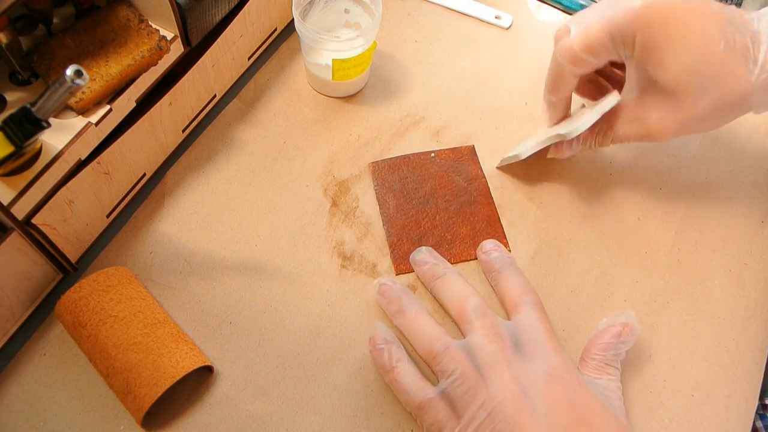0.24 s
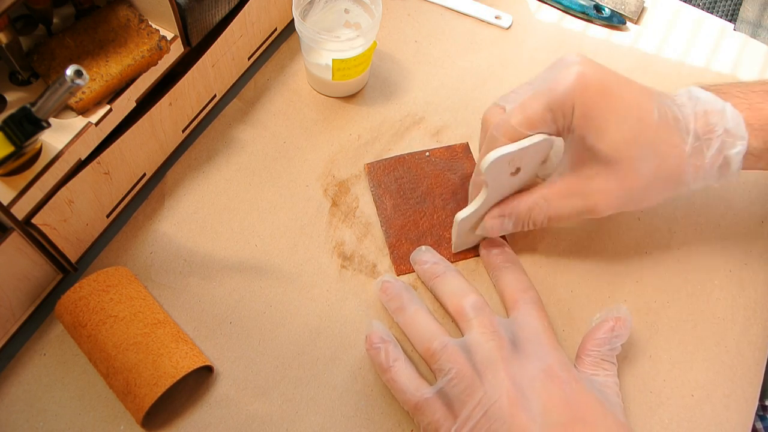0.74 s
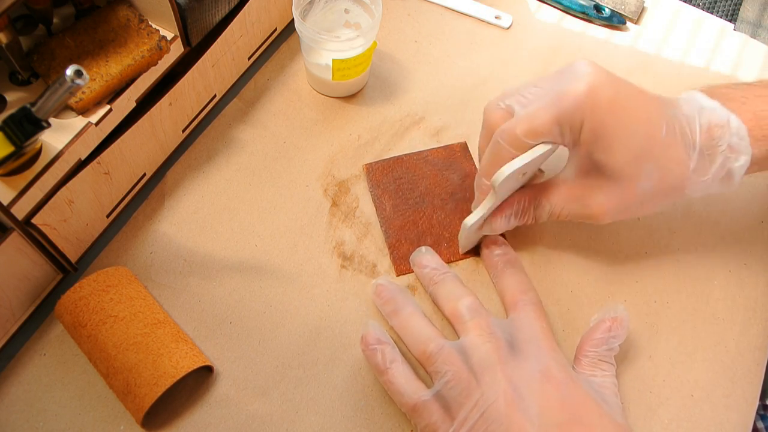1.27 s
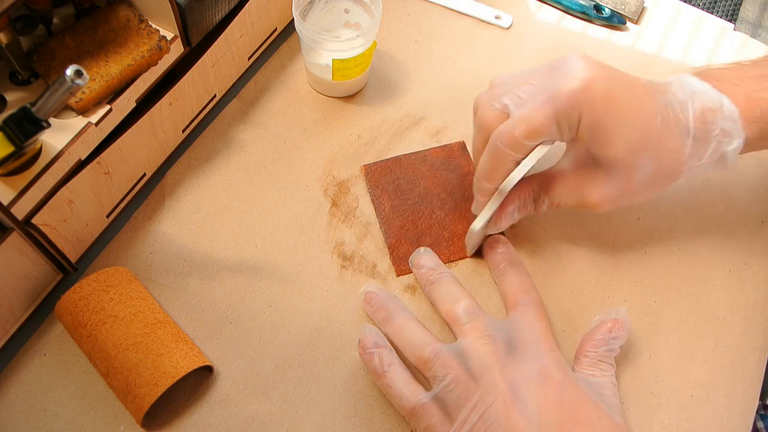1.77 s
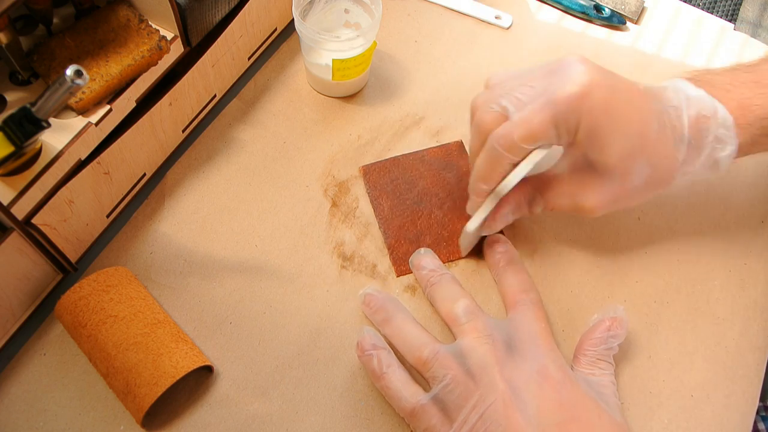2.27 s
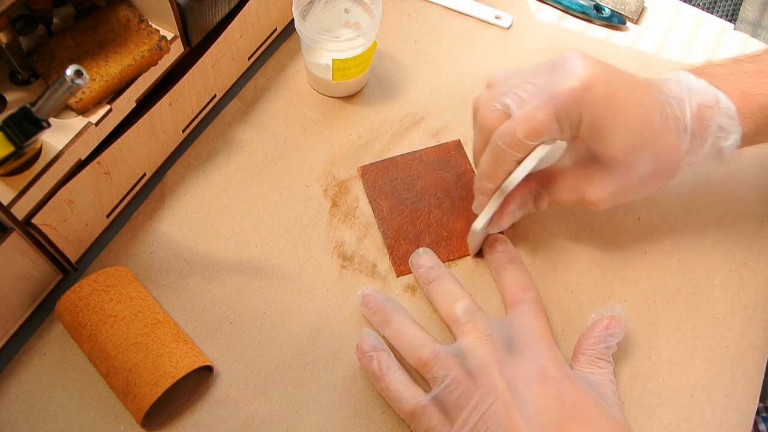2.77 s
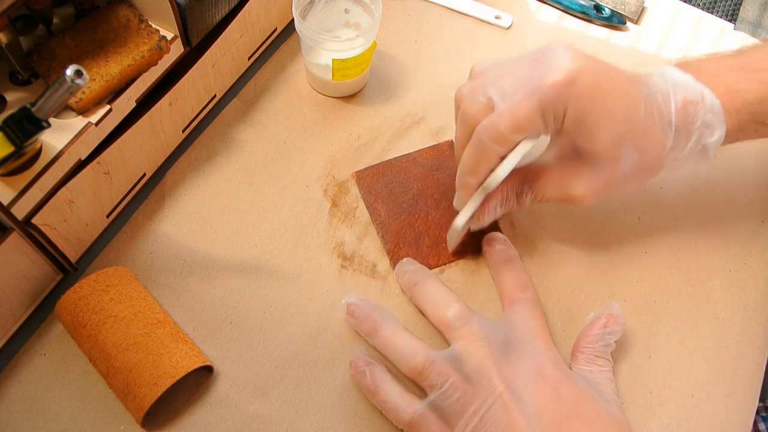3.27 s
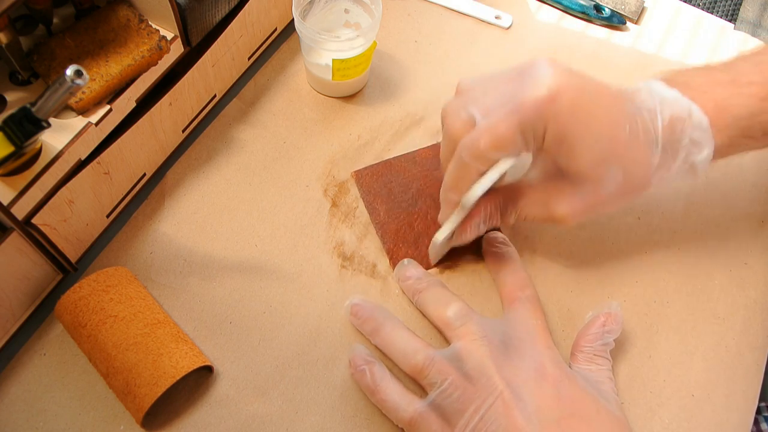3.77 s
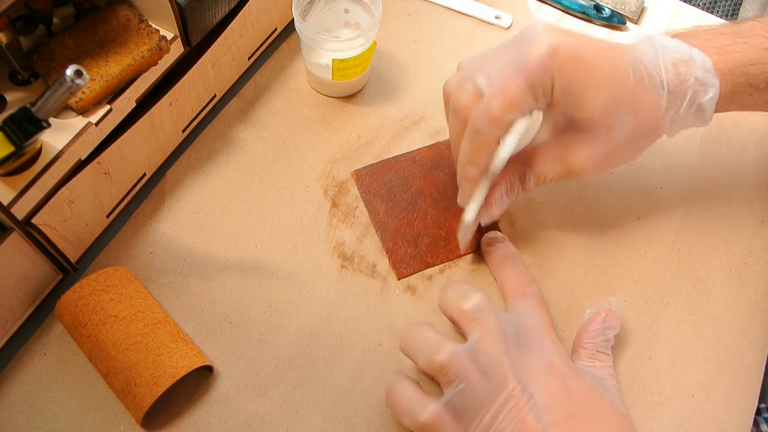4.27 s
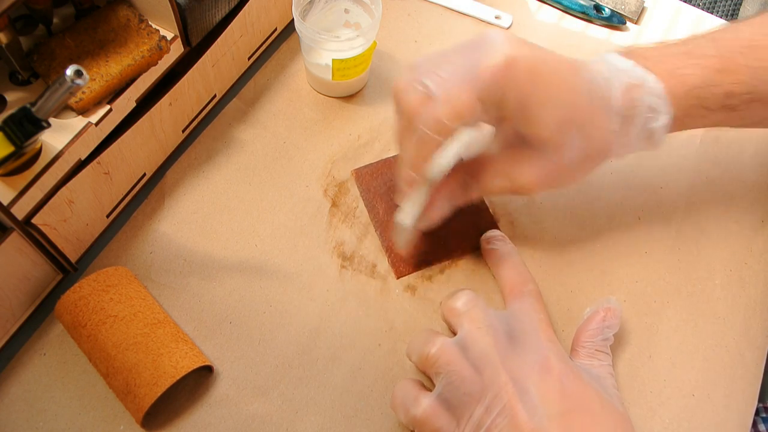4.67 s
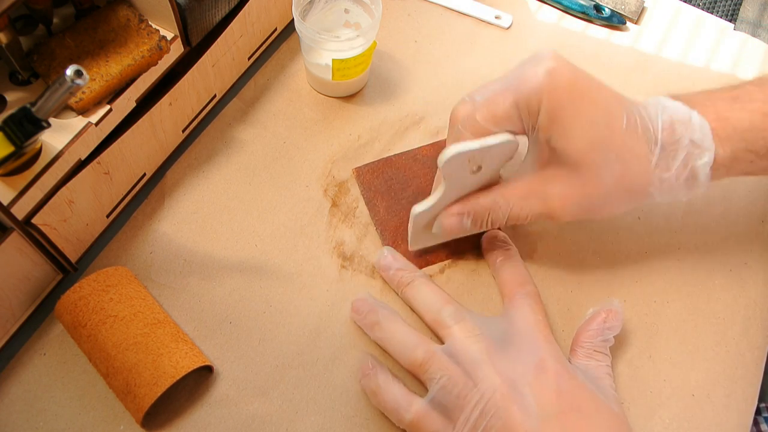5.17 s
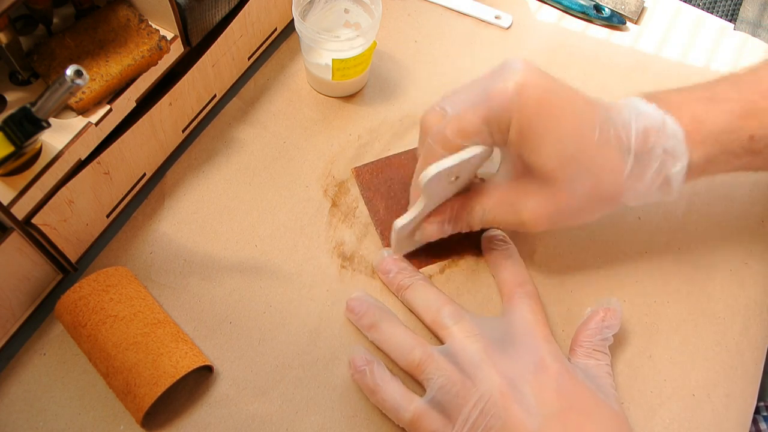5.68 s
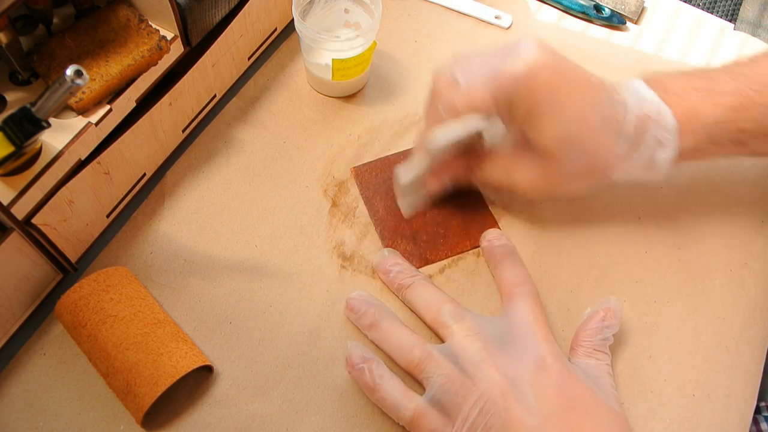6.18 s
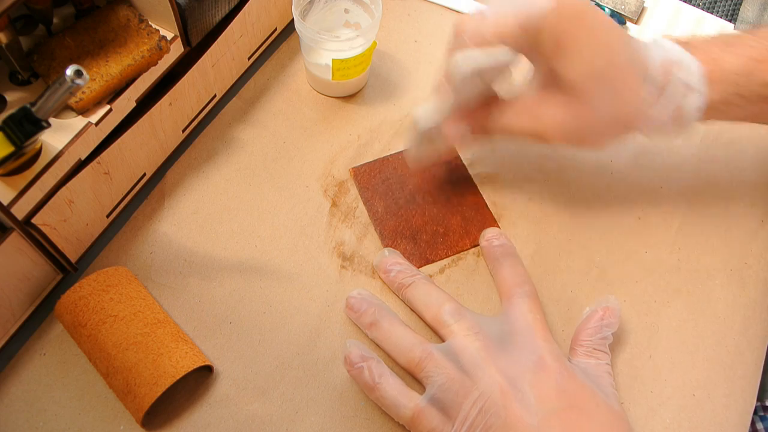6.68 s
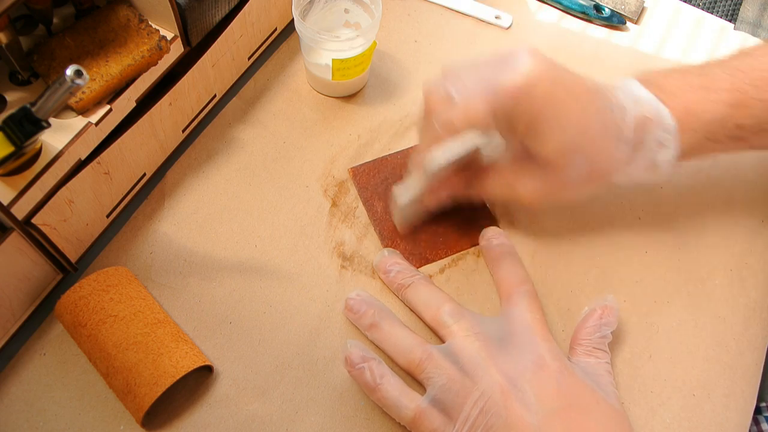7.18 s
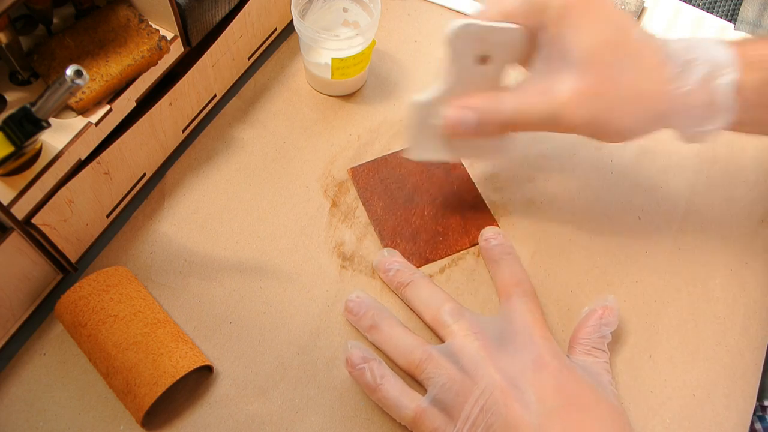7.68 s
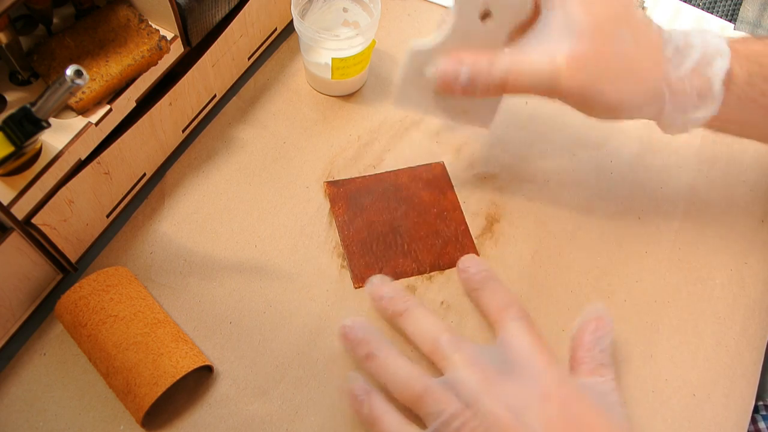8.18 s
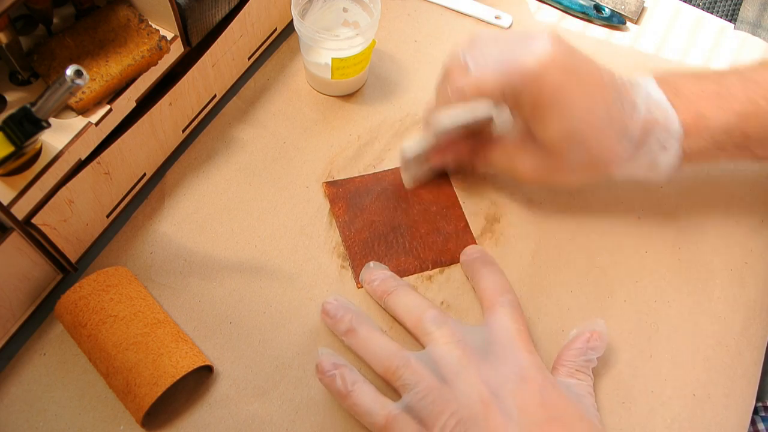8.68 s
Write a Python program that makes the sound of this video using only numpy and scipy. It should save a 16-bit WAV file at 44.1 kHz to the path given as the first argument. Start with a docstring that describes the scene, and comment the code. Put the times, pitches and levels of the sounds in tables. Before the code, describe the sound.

Gloved hands shuffle leather on a bench, then a small blade pats down, rasps across it and repeatedly cracks off the edge.

```python
"""Gloves and leather slide and scuff first, over faint room air and a low hum that wavers to the end.
From about one second a plastic spatula is drawn in quick strokes over leather on a workbench:
it lands with a pat and a soft thump, hisses over the grain and often snaps off onto the bench.
Ticks, knocks, rubs and slides fall in between; late on, one stroke drags the leather along the bench.
Friction is filtered noise, contacts are noise bursts, blade and bench ring as decaying modes."""
import sys
import numpy as np
from scipy import signal
from scipy.fft import rfft, irfft, next_fast_len
from scipy.io import wavfile
from scipy.ndimage import uniform_filter1d

SR = 44100
rng = np.random.default_rng(int(sys.argv[2]) if len(sys.argv) > 2 else 0)


def bounce(signal):
    """Save signal as a 16-bit WAV file at the path given by the first command-line argument."""
    frames = np.transpose(np.atleast_2d(signal))
    limited = np.clip(frames, -1, 1)
    pcm = np.round(limited * 32767).astype(np.int16)
    wavfile.write(sys.argv[1], SR, pcm)


N = 394254
TIME = np.arange(N) / SR


def amp(db):
    """Decibels to gain."""
    return 10 ** (np.asarray(db) / 20)


def unit(x):
    """Scales to an rms of one."""
    return x / np.sqrt(np.mean(x ** 2) + 1e-20)


def read(points, hz):
    """Reads a table of (f/Hz, value) on a log-frequency axis."""
    f, value = np.transpose(points)
    return np.interp(np.log(hz + 1), np.log(f + 1), value)


def add(mix, s, sound):
    """Mixes a sound in at time s."""
    start = max(round(s * SR), 0)
    part = mix[..., start:][..., :sound.shape[-1]]
    part += sound[..., :part.shape[-1]]


def shaped(x, gain):
    """Filters x by a gain given as a function of frequency."""
    size = next_fast_len(x.shape[-1])
    spectrum = rfft(x, size) * gain(np.fft.rfftfreq(size, 1 / SR))
    return irfft(spectrum, size)[..., :x.shape[-1]]


def coloured(x, points, size=2048):
    """Causal filter of unit energy with the spectrum of a table, so that attacks stay sharp."""
    hz = abs(np.fft.fftfreq(size, 1 / SR))
    log_gain = np.log(amp(read(points, hz)))
    minimum_phase = np.exp(np.conj(signal.hilbert(log_gain)))
    taps = np.fft.ifft(minimum_phase).real[:size // 2]
    return signal.oaconvolve(x, taps[None] / np.linalg.norm(taps))[:, :x.shape[-1]]


def drift(hz):
    """Slow random motion of rms one, up to about hz."""
    return unit(shaped(rng.standard_normal(N), lambda f: np.exp(-(f / hz) ** 2)))


def panned(pan_db):
    """Left and right gains for a left-right level difference."""
    gains = amp(np.array([[.5], [-.5]]) * pan_db)
    return gains / gains.mean(0)


def swelling(start, end, rise_s, fall_s):
    """Rises smoothly to one at start, holds until end and falls smoothly."""
    early = np.maximum(start - TIME, 0) / rise_s
    late = np.maximum(TIME - end, 0) / fall_s
    return np.exp(-early ** 2 - late ** 2)


# decay of the workshop's reflections: (f/Hz, t60/s)
ROOM_DECAY = [(100, 0.49), (500, 0.19), (1500, 0.2), (4000, 0.16), (10000, 0.14), (16000, 0.14)]


def room(x, wet_db, build_s=0.0026):
    """Adds dense reflections that build up quickly and die band by band, different at each ear."""
    t = np.arange(SR // 2) / SR
    hz, at, z = signal.stft(rng.standard_normal((2, len(t))), SR, nperseg=256)
    fade = amp(-60 * at / read(ROOM_DECAY, hz)[:, None])
    tail = signal.istft(z * fade, SR, nperseg=256)[1][:, :len(t)]
    tail *= 1 - np.exp(-t / build_s)
    tail /= np.linalg.norm(tail, axis=1, keepdims=True)
    return x + amp(wet_db) * signal.oaconvolve(x, tail, axes=1)[:, :x.shape[-1]]


def burst(decay_s):
    """A contact: a puff of noise, even in colour, that dies at once."""
    t = np.arange(SR // 2) / SR
    fade = np.exp(-t / decay_s)
    puff = rng.standard_normal(len(t))
    for _ in range(4):  # fade it, then flatten its spectrum again
        puff = irfft(np.exp(1j * np.angle(rfft(puff * fade))), len(t))
    puff *= np.minimum(1, 10 * fade)
    return puff * np.linalg.norm(fade) / np.linalg.norm(puff)


def spread(decay_s, apart):
    """A contact along the whole edge of the blade reaches the two ears partly unlike."""
    mid, side = burst(decay_s), burst(decay_s)
    return np.array([mid + apart * side, mid - apart * side]) / np.hypot(1, apart)


# steady room air, colour: (f/Hz, level/dB)
AIR_COLOUR = [(15, -43), (25, -13), (110, -2), (195, -2), (249, -6), (463, -10), (714, -13), (887, -11.5),
              (1130, -13.5), (2000, -16), (2280, -16), (4140, -16.5), (4740, -16.5), (8590, -19.5),
              (11300, -18.5), (16000, -21)]
# likeness of the air at the two ears: (f/Hz, likeness 0-1)
AIR_LIKENESS = [(60, 0.51), (180, 0.59), (550, 0), (1650, 0.011), (4970, 0.0), (15000, 0.49)]
# balance of the air: (f/Hz, left-right level/dB)
AIR_BALANCE = [(60, -6.5), (240, -3), (950, 3.5), (3770, 1), (15000, -2.5)]
# swell of the hum before its random waver: (t/s, level/dB)
HUM_SWELL = [(0, -62), (0.95, -55.5), (1.18, -46.5), (1.42, -62.5), (2.78, -54.5), (2.92, -41.5),
             (3.1, -54), (3.55, -49), (3.72, -56), (4.0, -50.5), (4.65, -49.8), (5.35, -54.5),
             (7.05, -63.5), (7.4, -46.5), (7.92, -40), (8.1, -54), (8.62, -43), (8.94, -50.5)]
# partials of the hum, each wandering around its pitch: (f/Hz, level/dB)
HUM_PARTIALS = [(190.3, 2), (130.6, -12.5), (58.4, -13.5), (437, -13.5)]


def workshop(air_db=-45.5, waver_db=2.6, wander_hz=5):
    """Steady room air is coloured noise; the low hum is sines that waver in pitch and level."""
    a, b = rng.standard_normal((2, N))

    def same(f):
        return np.clip(read(AIR_LIKENESS, f), 0, 1)

    right = shaped(a, same) + shaped(b, lambda f: np.sqrt(1 - same(f) ** 2))
    pair = np.array([a, right])
    air = shaped(pair, lambda f: amp(read(AIR_COLOUR, f)) * panned(read(AIR_BALANCE, f)))
    hum = np.zeros(N)
    for hz, db in HUM_PARTIALS:
        turns = np.cumsum(hz + wander_hz * drift(14.1)) / SR
        hum += amp(db) * np.sin(2 * np.pi * turns)
    swell = amp(np.interp(TIME, *np.transpose(HUM_SWELL)) + waver_db * drift(8.1))
    return amp(air_db) * air / air.mean(0).std() + hum * swell * panned(-10)


# the hand that steadies the leather shifts on the bench: (start t/s, end t/s, level/dB)
HAND_RUBS = [(0.0, 0.194, -50.5), (0.254, 0.33, -51.5), (1.097, 1.29, -53), (5.1, 5.46, -53),
             (7.79, 8.222, -51)]
# dull colour of the rub: (f/Hz, level/dB)
RUB_COLOUR = [(40, -22), (130, 4), (300, -3.5), (480, 4.5), (900, -2.5), (1500, -18.5), (3000, -17),
              (8000, -38)]


def rubs(ease_s=0.017, uneven_db=2):
    """Soft friction of a gloved hand: dull noise, unsteady and with little treble."""
    press = sum(amp(db) * swelling(start, end, ease_s, ease_s) for start, end, db in HAND_RUBS)
    skin = unit(shaped(rng.standard_normal(N), lambda f: amp(read(RUB_COLOUR, f))))
    return room(press * amp(uneven_db * drift(25)) * skin * panned(-8.0), wet_db=-5.5)


# scuffs, swishes, ticks and a few squeaks of blade, leather and gloves:
# (middle t/s, length/s, centre f/Hz, bandwidth/Hz, level/dB)
SHORT_SCUFFS = [(0.108, 0.032, 200, 157, -30.5), (0.176, 0.021, 9400, 7240, -20),
                (0.256, 0.019, 3250, 2520, -33), (0.323, 0.07, 2820, 1500, -36),
                (0.362, 0.034, 9400, 10900, -32.5), (0.892, 0.071, 8150, 3200, -29.5),
                (0.968, 0.12, 3100, 1200, -35.5), (1.416, 0.1, 3000, 1600, -43),
                (3.571, .006, 9000, 4000, -30), (4.202, 0.003, 11500, 4000, -30),
                (4.292, .008, 9600, 4000, -32.5), (4.504, 0.003, 9500, 7000, -29),
                (5.75, 0.012, 6500, 4500, -38), (5.827, 0.028, 7650, 2500, -36.5),
                (7.295, .012, 10000, 8000, -36), (7.931, 0.016, 7100, 1200, -24),
                (8.333, 0.057, 1556, 160, -46.5), (8.497, 0.0032, 7650, 1800, -37)]


def scuffs():
    """Brief scuffs, swishes, ticks and a few squeaks: swelling noise bursts, each in a narrow or wide band."""
    out = np.zeros(N)
    for s, length, hz, width, db in SHORT_SCUFFS:
        rub = shaped(rng.standard_normal(SR // 5), lambda f: 1 / (1 + (2 * (f - hz) / width) ** 4))
        swell = np.hanning(min(round(length * SR), len(rub)))
        add(out, s - length / 2, amp(db) * unit(rub[:len(swell)]) * swell)
    return room(out * panned(-9.0), wet_db=-3)


# light ticks of the blade: (t/s, level/dB, gain of the low part/dB)
LIGHT_TICKS = [(1.5564, -42.5, 16), (2.113, -51.5, 22.5), (2.6423, -52, 21), (3.2122, -17, 1),
               (3.6056, -23, 3.5), (4.1445, -32.5, -21), (8.2734, -37, 17.5)]
# colour of the blade's ticks, and of its cracks on the bench: (f/Hz, level/dB)
CRACK_COLOUR = [(60, -41), (300, -11), (600, -1.5), (950, -7.5), (1350, -5), (1900, -3), (2900, -2),
                (4300, -1), (6000, -1), (9000, -1), (12000, 2.5), (14000, -3), (16000, 0.5)]


def ticks(split_hz=3500):
    """Light contacts that leave the bench still: noise bursts with more or less low part."""
    out = np.zeros((2, N))
    for s, db, dull_db in LIGHT_TICKS:
        tick = spread(decay_s=0.0033, apart=0.5)
        low = signal.lfilter(*signal.butter(1, split_hz, fs=SR), tick)
        add(out, s, amp(db) * (tick + (amp(dull_db) - 1) * low))
    return room(coloured(out * panned(-4.0), CRACK_COLOUR), wet_db=0.5)


# dull knocks where the blade meets the bench flat: (t/s, level/dB)
FLAT_KNOCKS = [(0.093, -35.5), (1.743, -39), (1.762, -37.5), (5.037, -39), (6.279, -29.5), (6.629, -28.5),
               (7.6164, -22.5)]
# woody colour of the knocks: (f/Hz, level/dB)
KNOCK_COLOUR = [(60, -21), (250, 1.5), (500, 1.5), (850, -1), (1400, -1), (2000, -12), (3000, -28),
                (8000, -32)]


def knocks():
    """Blunt contacts: a sudden, woody clatter of short noise with little treble."""
    out = np.zeros((2, N))
    for s, db in FLAT_KNOCKS:
        add(out, s, amp(db) * spread(decay_s=0.0097, apart=0.4))
    return room(coloured(out * panned(-6.5), KNOCK_COLOUR), wet_db=-5)


# modes of the bench top, pitch before chance detuning: (f/Hz, level/dB, t60/s)
BENCH_MODES = [(60.3, -3, 0.67), (82, -13, 0.17), (115.7, 0, 0.28), (130.8, 15, 0.18), (169.2, 2.5, 0.19),
               (212.5, -11.5, 0.53), (277.5, 1, 0.11), (353, -11.5, 0.21), (346.6, -5.5, 0.18),
               (407, -4.5, 0.17), (443.4, 6.5, 0.054), (522, -10, 0.26), (600, -14.5, 0.081),
               (653, -27, 0.17), (724, -46, 0.36)]


def bench(knock_db, contact_s, split_hz=245, lowest_hz=70):
    """The bench top rings after a push; knock_db sets how strongly its upper modes sound."""
    t = np.arange(SR // 2) / SR
    ring = np.zeros(len(t))
    for hz, db, t60 in BENCH_MODES:
        upper = hz > split_hz  # these differ with the spot that is struck
        turn = hz * t * (1 + 0.012 * rng.standard_normal()) + upper * rng.random()
        ring += amp(db + upper * knock_db - 60 * t / t60) * np.cos(2 * np.pi * turn)
    ring *= 1 - np.exp(-t / contact_s)
    # a board radiates little below its lowest modes
    return signal.sosfilt(signal.butter(2, lowest_hz, "high", fs=SR, output="sos"), ring)


# modes of the plastic blade, damped by the hand: (f/Hz, level/dB, t60/s before the hold factor)
BLADE_MODES = [(1883, -0.5, 0.035), (2405, -3, 0.048), (2663, 3.5, 0.0088), (2600, -12, 0.031),
               (3200, -7, 0.022), (4790, -8, 0.066)]


def blade(hold):
    """The short woody ring of the blade, longer when it hangs free (hold scales its decay times)."""
    t = np.arange(SR // 2) / SR
    ring = np.zeros(len(t))
    for hz, db, t60 in BLADE_MODES:
        tone = np.sin(2 * np.pi * hz * rng.normal(1, 0.0032) * t)
        ring += amp(db - 60 * t / (t60 * hold)) * tone
    return ring


# the blade is set down: (t/s, tick level/dB, thump level/dB, knock against thump/dB)
BLADE_LANDINGS = [(0.0904, -27, -39, -9), (1.7351, -38, -46.5, 5), (1.777, -40, -45.5, -19),
                  (2.2804, -36.5, -37, -5), (2.7823, -35, -44.5, -25), (3.3419, -37.5, -40.5, -17),
                  (3.8231, -36.5, -45, -10), (4.371, -44, -50.5, -19), (4.7912, -34, -37, -2),
                  (6.114, -32, -37, -13), (6.47, -28, -32, -24), (6.82, -28.5, -32.5, -8),
                  (7.1564, -27.5, -35.5, 0.5), (7.437, -23.5, -31, 6), (8.496, -34.5, -50, 2.5),
                  (8.9304, -31, -34.5, -3.5)]
# colour of blade on leather: (f/Hz, level/dB)
PAT_COLOUR = [(60, -18), (250, 12), (480, 5.5), (750, 0.5), (1500, -3), (2400, 2), (3200, -7.5), (7000, -3),
              (11000, -4), (16000, -13)]


def landings(ring_db=-9.5, hold=.85):
    """The leather cushions the blade: a faint pat and a short ring over the thump of the bench."""
    pats, rings, thumps = np.zeros((3, 2, N))
    for s, tick_db, thump_db, knock_db in BLADE_LANDINGS:
        add(pats, s, amp(tick_db) * spread(decay_s=0.0053, apart=0.51))
        add(rings, s, amp(tick_db + ring_db) * blade(hold))
        add(thumps, s, amp(thump_db) * bench(knock_db, contact_s=0.0019))
    contact = room((coloured(pats, PAT_COLOUR) + rings) * panned(-6.0), wet_db=-2.5)
    return contact + room(thumps * panned(-8.0), wet_db=-12)


# the blade snaps off the edge onto the bench: (t/s, crack level/dB, thump level/dB,
# knock against thump/dB, rattle against crack/dB, left-right level/dB)
EDGE_SNAPS = [(0.9962, -0.5, -33, 10.5, -17.5, -4.5), (4.0370, -6, -41, 12, -23, -3),
              (5.5100, -1, -32, 9, -16, -3.5), (5.887, -6.5, -37, 4, -14, -3.5),
              (6.2770, -3.5, -31.5, 3, -37, -4), (6.6275, -2.5, -34, 6, -35, -4),
              (7.559, -6.5, -36, 4.5, -13.5, -3.5), (8.741, -8.5, -33.5, 7.5, -32, -8)]


def snaps(corner_db=-1, corner_s=.0009, ring_db=-22, bounce_db=11, bounce_s=.0228):
    """The bent blade slips off the edge, cracks on the bench, rings and rattles and drops once more."""
    cracks, thumps = np.zeros((2, N)), np.zeros(N)
    for s, crack_db, thump_db, knock_db, rattle_db, pan_db in EDGE_SNAPS:
        # a reversed burst grows into the blow
        slip = amp(-19) * spread(decay_s=0.0034, apart=0.41)[:, :SR // 50][:, ::-1]
        blow = amp(rattle_db) * spread(decay_s=0.038, apart=0.81) + amp(ring_db) * blade(hold=1.1)
        for late_s in (0, corner_s * rng.uniform(.5, 1.5)):  # one corner lands just before the other
            add(blow, late_s, amp(corner_db) * spread(decay_s=0.00069, apart=0.34))
        crack = room(np.hstack([slip, blow]), wet_db=-1.0)
        add(cracks, s - slip.shape[1] / SR, amp(crack_db) * panned(pan_db) * crack)
        add(thumps, s + 0.0019, amp(thump_db) * bench(knock_db, contact_s=0.0019))
        # the more it rattles, the harder it drops back
        drop_db = thump_db + rattle_db + bounce_db
        add(thumps, s + 0.00301 + bounce_s, amp(drop_db) * bench(knock_db, contact_s=0.0022))
    return coloured(cracks, CRACK_COLOUR) + room(thumps * panned(-8.0), wet_db=-20.5)


def slips(per_s, size_db, smooth):
    """Friction noise: sparse slips of uneven size in a wash of countless smaller ones."""
    sizes = rng.choice([-1, 1], N) * amp(size_db * np.minimum(rng.exponential(1, N), 3.5))
    sparse = sizes * (rng.random(N) < per_s / SR)
    return unit(unit(sparse) + smooth * rng.standard_normal(N))


# the blade is drawn over the leather; at 7.87 s it drags the leather along the bench:
# (start t/s, end t/s, level at the end/dB, swell from start to end/dB,
# bite = low against high hiss at the ends/dB)
BLADE_STROKES = [(0.949, 0.988, -25.5, 10, -2.5), (1.38, 1.516, -33.5, -0.5, -2.5),
                 (1.90, 2.023, -37.5, -0.5, 0.5), (2.388, 2.535, -40, -2.5, 0), (2.777, 3.04, -37, 10, -1),
                 (3.479, 3.594, -37, -3, -4.5), (3.89, 4.04, -34, 6.5, -2), (4.422, 4.6, -35, 6.5, -4),
                 (4.804, 5.08, -38.5, 5, -3.5), (5.375, 5.513, -37, 8, 1), (5.716, 5.9, -36, 7.5, -0.5),
                 (6.179, 6.27, -27.5, 7.5, -5.5), (6.514, 6.615, -30, 8.5, -3),
                 (6.863, 6.942, -23.5, 9.5, -4), (7.211, 7.28, -29.5, 6, 2.5),
                 (7.482, 7.564, -29, 5.5, 0.5), (7.868, 8.067, -22.5, 5, -45),
                 (8.608, 8.743, -19.5, 22.5, -2)]
# gloves and leather slide lightly over the bench: (peak t/s, rise/s, fall/s, level/dB, bite/dB)
LIGHT_SLIDES = [(0.01, 0.042, 0.031, -27.5, -4.5), (0.16, .045, 0.049, -29, -4.5),
                (0.265, 0.044, 0.071, -28, -5.5), (0.44, 0.068, 0.044, -28.5, -35),
                (0.567, 0.059, 0.042, -35, -18), (0.762, 0.051, 0.12, -34, -12.5),
                (0.893, 0.026, 0.084, -22.5, -40), (1.17, 0.11, .12, -46, 1.5),
                (1.35, 0.058, 0.051, -39.5, -4), (1.455, 0.027, 0.0097, -31, -22),
                (1.62, .03, .06, -44.5, -5), (1.785, 0.036, .014, -35, -14), (1.85, 0.05, .04, -40.5, -6),
                (2.547, 0.015, 0.032, -32.5, -23), (3.14, 0.035, .09, -40.5, -6.5),
                (3.295, .01, .02, -40.5, -3), (4.205, 0.036, 0.058, -41, -5),
                (4.298, 0.013, 0.032, -37, -12), (4.375, 0.018, 0.026, -38.5, -11),
                (4.968, 0.05, .042, -21.5, -20), (5.04, .01, 0.027, -33, -10), (5.19, 0.06, 0.075, -43, -7),
                (7.738, 0.054, 0.037, -33.5, -27.5), (7.825, 0.025, .04, -34, -2.5),
                (7.93, 0.046, 0.055, -35, -24), (8.17, 0.043, 0.091, -45, 1),
                (8.34, 0.041, 0.084, -42.5, -0.5)]


def friction(grip_s=0.022, lift_s=0.029, speed_arch_db=1, bite_arch_db=1.54):
    """Strength of high and low hiss at each ear: stroke and slide powers add up."""
    strokes, slides = np.zeros((2, 2, N))
    for start, end, db, swell_db, bite_db in BLADE_STROKES:
        to_go = np.clip((end - TIME) / (end - start), 0, 1)
        speed = np.sin(np.pi * to_go)  # fastest at mid stroke: louder, and it bites deeper
        level = amp(db - swell_db * to_go + speed_arch_db * speed)
        press = level * swelling(start, end, grip_s, lift_s)
        strokes += np.array([press, press * amp(bite_db + bite_arch_db * speed)]) ** 2
    for s, rise_s, fall_s, db, bite_db in LIGHT_SLIDES:
        slides += np.outer(amp([db, db + bite_db]), swelling(s, s, rise_s, fall_s)) ** 2
    stroke_power = strokes[:, None] * panned(-4) ** 2
    slide_power = slides[:, None] * panned(-4.5) ** 2
    return np.sqrt(stroke_power + slide_power)


# colour of the hiss over the grain: (f/Hz, level/dB)
HISS_COLOUR = [(60, -43), (250, 2), (500, -2), (900, -1.5), (1300, -2), (1900, 1.5), (3000, 4), (4500, 2.5),
               (6000, 1.9), (8000, 1.25), (12000, 4), (14500, 1), (16000, -3)]


def scraping(split_hz=3600, judder_db=1.18, patchy_db=2.06, apart=0.78, body_db=-18):
    """Tiny slips over the grain; a biting edge deepens the hiss and shakes the bench."""
    high, low = friction()
    mid, side = (slips(per_s=3000, size_db=-1.0, smooth=2.4) for _ in range(2))
    grain = np.array([mid + apart * side, mid - apart * side]) * amp(judder_db * drift(94))
    # the colour shifts as different parts of the edge meet the grain
    z = signal.stft(grain, nperseg=512)[2]
    patches = uniform_filter1d(rng.standard_normal(z.shape[1:]), size=7, axis=0)
    patches = unit(uniform_filter1d(patches, size=5, axis=1))
    patchy = signal.istft(z * amp(patchy_db * patches), nperseg=512)[1][:, :N]
    hiss = unit(coloured(patchy, HISS_COLOUR))
    deep = shaped(hiss, lambda f: 1 / (1 + (f / split_hz) ** 4))

    def bench_gain(f):
        return sum(amp(db) / (1 + ((f - hz) / 14) ** 2) for hz, db, _ in BENCH_MODES)

    body = unit(shaped(mid, bench_gain))
    return room(high * (hiss - deep) + low * deep + amp(body_db) * low * body, wet_db=-11.5)


def scene():
    """Everything on and around the bench."""
    background = workshop() + rubs()
    contacts = scuffs() + ticks() + knocks() + landings() + snaps()
    return background + contacts + scraping()


# balance of the microphone pair: (f/Hz, left-right level/dB)
MIC_BALANCE = [(100, 2.5), (280, 1), (1000, -3.5), (2000, -1.9), (4000, -2), (9000, 0.4), (14000, 1)]


def record(dry):
    """Two microphones differ a little in colour; peaks overload softly; then the band limit."""
    heard = shaped(dry, lambda f: panned(read(MIC_BALANCE, f)))
    held = heard / (1 + heard ** 4) ** (1 / 4)
    lowpass = signal.firwin(401, 15950, window=("kaiser", 8), fs=SR)  # cutoff in Hz
    return signal.oaconvolve(held, lowpass[None], "same")


dry = scene()
out = record(dry)
bounce(out)
```